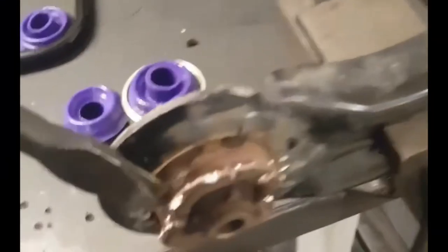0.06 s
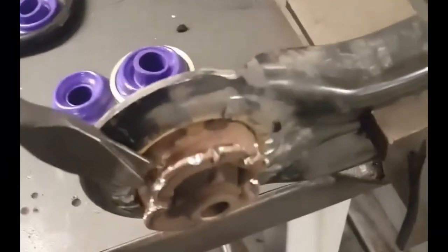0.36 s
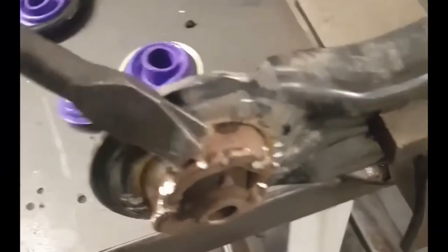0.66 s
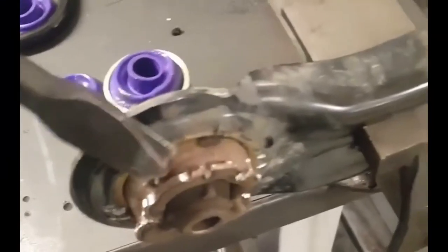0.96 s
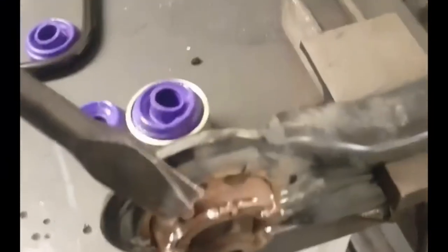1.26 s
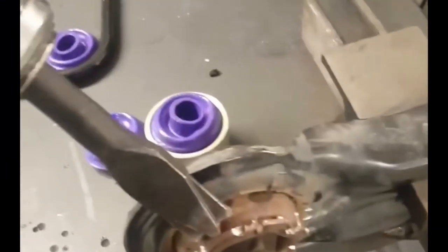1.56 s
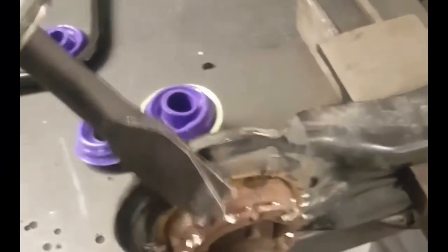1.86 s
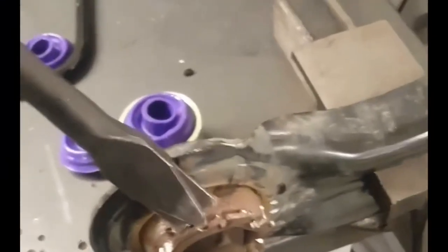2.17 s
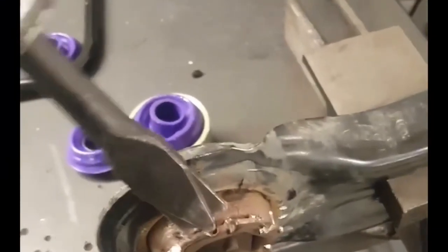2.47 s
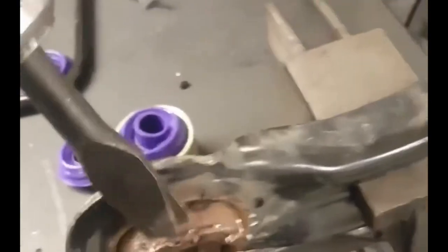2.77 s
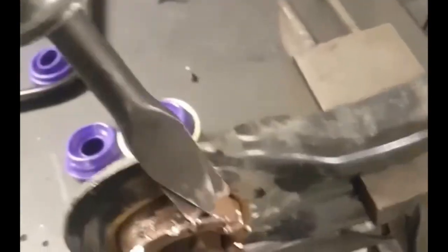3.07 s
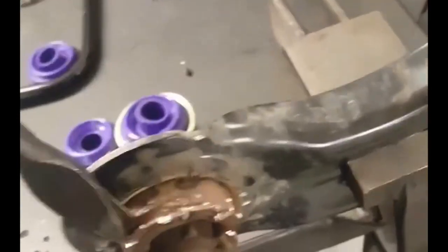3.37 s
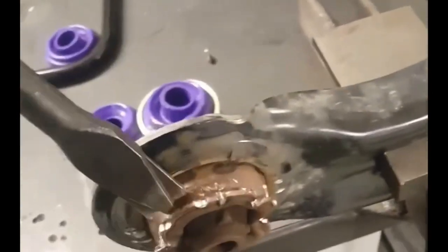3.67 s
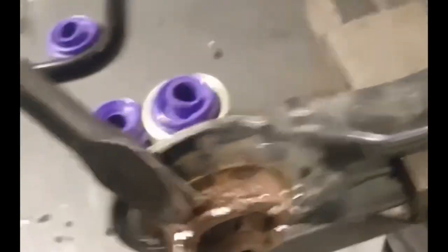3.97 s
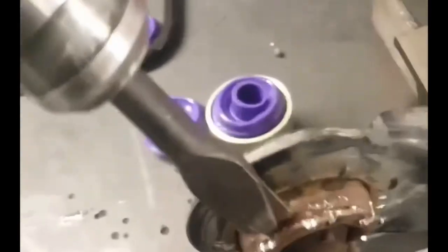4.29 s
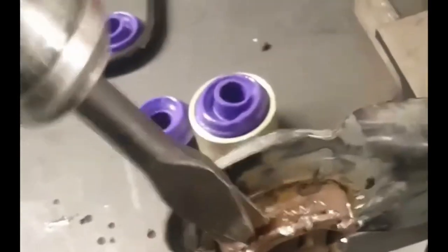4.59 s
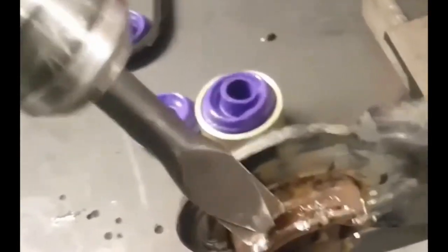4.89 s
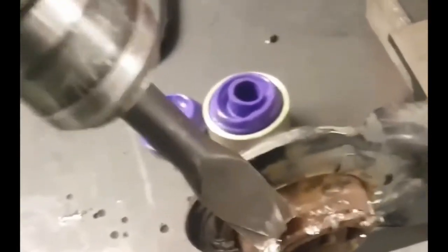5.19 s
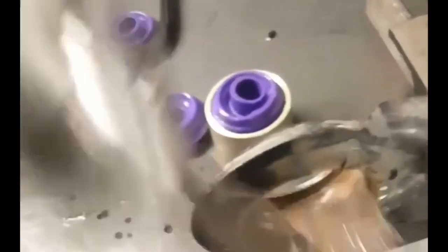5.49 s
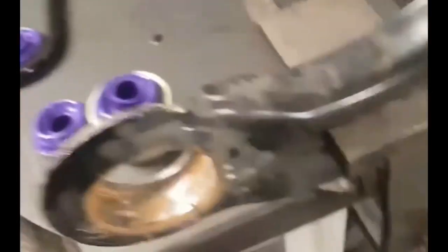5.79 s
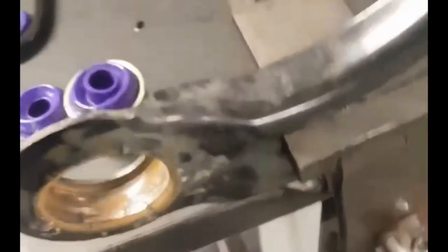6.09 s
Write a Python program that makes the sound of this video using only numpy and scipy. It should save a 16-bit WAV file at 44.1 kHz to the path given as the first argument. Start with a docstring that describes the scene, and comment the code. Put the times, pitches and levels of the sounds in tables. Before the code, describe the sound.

An air chisel works on a steel suspension arm near the microphone. Handling thuds and a light hiss lead into a stuttering string of metallic strikes that slows, picks up and ends in a quick burst. A lull follows, with a knock and more hissing, then the tool roars four times in short, bright, rattling runs. The chisel clinks loosely in the gaps, over a low wash of workshop noise.

```python
"""An air hammer drives a chisel into the bush of a steel suspension arm, close by in an echoing workshop.
At half throttle the piston slows and picks up again, each stroke a puff of exhaust and a blow on steel;
full throttle gives short roaring runs of about 41 blows a second, the bouncing edge rattling on top.
Dull thuds come from handling the chisel and as the hammer starts; the chisel knocks loosely, and air
hisses as the trigger is eased in. A wash of workshop noise swells and sinks behind it all."""
import sys
import numpy as np
from scipy import signal
from scipy.fft import rfft, irfft, next_fast_len
from scipy.io import wavfile
from scipy.ndimage import uniform_filter1d

SR = 44100
rng = np.random.default_rng(int(sys.argv[2]) if len(sys.argv) > 2 else 0)


def generate_wav(sig):
    """Save sig (samples, or channels by samples) to the path in sys.argv[1] as 16-bit PCM at SR."""
    pcm = np.round(np.clip(np.atleast_2d(sig).T, -1, 1) * 32767).astype(np.int16)
    wavfile.write(sys.argv[1], SR, pcm)


N = 275625
LEFT_LEAD_S = .00036  # the tool's sound reaches the left side first


def amp(db):
    """Decibels to gain."""
    return 10 ** (np.asarray(db) / 20)


def unit(x):
    """x at rms 1."""
    return x / np.sqrt(np.mean(x ** 2) + 1e-20)


def along(points, hz):
    """Read a curve of (Hz, value) points on a log frequency axis."""
    freqs, values = np.transpose(points)
    return np.interp(np.log(hz + 1), np.log(freqs + 1), values)


def filtered(x, response):
    """Filter x by a complex response, given as a function of Hz."""
    size = next_fast_len(N + SR // 2)
    return irfft(rfft(x, size) * response(np.fft.rfftfreq(size, 1 / SR)), size)[..., :N]


def add(track, start_s, sound):
    """Mix a sound into a track."""
    part = track[..., max(round(start_s * SR), 0):][..., :sound.shape[-1]]
    part += sound[..., :part.shape[-1]]


def bursts(times, levels_db, rise, hold, t60):
    """Envelope of bursts that rise, hold and die away (all in seconds); overlaps add in power."""
    t = np.arange(SR // 2) / SR
    power = np.zeros(N)
    for start, db, attack, held in np.broadcast(times, levels_db, rise, hold):
        burst = (1 - np.exp(-t / attack)) * amp(db - 60 * np.maximum(t - held, 0) / t60)
        add(power, start, burst ** 2)
    return np.sqrt(power)


# Stereo image of the direct sound. Each row: frequency in Hz, left-right likeness from 0 to 1.
DIRECT_LIKENESS = [(60, .6), (130, .7), (250, .92), (500, 0.95), (1300, 0.65), (2500, 0.35), (5000, 0.27),
                   (12000, 0.12)]
def noise(spectrum, patchy_db, lead_s=LEFT_LEAD_S, patch=(4, 5)):
    """Stereo noise of rms 1 whose colour shifts in patches of (bins, frames); the left side leads."""
    def mid_side(hz):
        angle = np.arccos(np.clip(along(DIRECT_LIKENESS, hz), -1, 1)) / 2
        return amp(along(spectrum, hz)) * [np.cos(angle), np.sin(angle)]

    white = signal.stft(rng.standard_normal((2, N)), nperseg=512)[2]
    patches = uniform_filter1d(rng.standard_normal(white.shape[1:]), size=patch[0], axis=0)
    patches = uniform_filter1d(patches, size=patch[1], axis=1)
    colour = amp(patchy_db * 2 * np.tanh(unit(patches) / 2))
    mottled = signal.istft(white * colour, nperseg=512)[1][:, :N]
    mid, side = filtered(mottled, mid_side)
    stereo = np.array([mid + side, mid - side])
    early_s = np.array([[lead_s], [-lead_s]]) / 2
    return unit(filtered(stereo, lambda hz: np.exp(2j * np.pi * hz * early_s)))


# Decay of the workshop's reverb. Each row: frequency in Hz, t60 in seconds.
ROOM_DECAY = [(100, 0.11), (400, 0.71), (1200, 0.37), (3000, 0.36), (6000, 0.25), (12000, 0.33)]
# Stereo image of the reflections. Each row: frequency in Hz, left-right likeness from 0 to 1.
ECHO_LIKENESS = [(100, .45), (300, 0.99), (700, 0.36), (1500, 0)]
def reflections(x, decay, build_s, span_s=.45):
    """Diffuse echoes, drawn afresh every span so no fixed pitch rings on; decay varies with frequency."""
    out = np.zeros((2, N))
    for start in np.arange(0, N / SR, span_s):
        hz, t, wash = signal.stft(rng.standard_normal((2, SR * 2 // 3)), SR, nperseg=256)
        alike = np.clip(along(ECHO_LIKENESS, hz), 0, 1)[:, None]
        wash[1] = alike * wash[0] + np.sqrt(1 - alike ** 2) * wash[1]
        tail = signal.istft(wash * amp(-60 * t / along(decay, hz)[:, None]), SR, nperseg=256)[1]
        tail *= 1 - np.exp(-np.arange(tail.shape[1]) / SR / build_s)
        part = x[:, round(start * SR):round((start + span_s) * SR)]
        add(out, start, signal.fftconvolve(part, tail / np.linalg.norm(tail[0]), axes=1))
    return out


# Fader ride of the background bed. Each row: time in seconds, relative level in dB.
BED_RIDE = [(0, -31.5), (.27, -43), (.55, -45), (.99, -36.5), (1.005, -30), (1.45, -40.5), (3.3, -34),
            (3.65, -47.5), (4.2, -32), (5.7, -29), (6.25, -29.5)]
# Tone of the bed. Each row: frequency in Hz, relative level in dB.
BED_TONE = [(30, -72), (80, -5.5), (130, -3.5), (250, -3.5), (500, -3), (800, 1.5), (1200, 6.5),
            (2000, 1.5), (3500, -4), (5000, -15), (8500, -18), (10500, -16), (13000, -25)]
def workshop():
    """A diffuse bed of noise, a little to the right, that swells and sinks."""
    level_db = np.interp(np.arange(N) / SR, *np.transpose(BED_RIDE))
    return amp(level_db) * noise(BED_TONE, patchy_db=1.5, lead_s=LEFT_LEAD_S / 2) * amp([[2.5], [5.5]])


# Air escaping at the valve. Each row: start in seconds, end in seconds, relative level in dB.
AIR_LEAKS = [(0.487, 1.665, -33), (3.054, 3.85, -46), (3.732, 4.226, -27)]
# Tone of the hiss. Each row: frequency in Hz, relative level in dB.
HISS_TONE = [(150, 5), (500, -2), (900, -36), (1500, 4.5), (2300, -6), (3500, 4), (5000, 5), (6500, 2.5),
             (8300, -1.5), (10000, 5), (12500, 6)]
def air(swell_s=.36, cut_s=.0039):
    """Air hisses from the half-open valve, swelling until the piston takes it; a faint leak stays on."""
    t = np.arange(N) / SR
    flow = sum(amp(db) * np.clip((t - start) / swell_s, 0, 1) * np.clip((end - t) / cut_s, 0, 1)
               for start, end, db in AIR_LEAKS)
    hiss = noise(HISS_TONE, patchy_db=1, lead_s=LEFT_LEAD_S / 2)
    return (flow + amp(-48)) * hiss * amp([[5.5], [5.8]])


# Dull low thuds. Each row: start in seconds, relative thud level in dB,
# scrape in dB against that level, hold in seconds, attack in seconds.
LOW_THUDS = [(0.575, -36.5, -2, .02, 0.0024), (0.639, -38.5, 16.5, 0.036, .008),
             (0.667, -19.5, -1.5, 0.026, .0013), (0.74, -35.5, 4.5, 0.035, 0.011),
             (0.946, -36, -18, .033, .004), (1.127, -32, -22, 0.036, .004),
             (1.251, -32.5, -19, .035, 0.0045), (1.706, -16.5, -14, 0.03, .0013),
             (3.886, -22.5, 2, 0.017, 0.0031), (4.219, -18, -16, 0.042, 0.0017)]
# Tone of the thud. Each row: frequency in Hz, relative level in dB.
THUD_TONE = [(25, -13), (70, -6.5), (110, 0.5), (160, 0), (250, 1), (390, -0.5), (550, -12.5), (1000, -31),
             (3000, -63)]
def low_thuds():
    """Dull thuds from handling the chisel and thumps of air as the hammer starts, each with a scrape."""
    times, db, scrape_db, hold, rise = np.transpose(LOW_THUDS)
    thud = bursts(times, db - .5, rise, hold, t60=.31) * noise(THUD_TONE, patchy_db=3, lead_s=0)
    scrape_level = bursts(times - .002, db + scrape_db, rise, hold, t60=.2)
    scrape = noise(CLANG_TONE, patchy_db=7.5) + amp(-9) * noise(SNAP_TONE, patchy_db=5)
    return thud + scrape_level * scrape


CAVITY_HZ = 638
def puffs(times, levels_db, hz, glide_hz_per_s=19400, cavity_share=1.0, peak_s=.0036):
    """Each puff of exhaust is a short, swelling upward chirp that also rings the exhaust cavity."""
    t = np.arange(SR // 10) / SR
    swell = (t / peak_s * np.exp(1 - t / peak_s)) ** 2
    out = np.zeros(N)
    for start, db in zip(times, levels_db):
        note_hz, cavity_hz = np.array([hz, CAVITY_HZ]) * (1 + .11 * rng.standard_normal(2))
        note = np.sin(2 * np.pi * (note_hz + glide_hz_per_s * t / 2) * t)
        cavity = cavity_share * np.cos(2 * np.pi * cavity_hz * t)
        add(out, start, amp(db) * swell * (note + cavity))
    return out


# Kicks of the valve as the piston starts from rest.
# Each row: start in seconds, relative gust level in dB, cavity ring level in dB.
VALVE_KICKS = [(1.6445, -10, -5), (1.671, -6, -5.5), (1.696, -2, -19), (4.219, -2.5, -30)]
def valve(cavity_lag_s=.0083, push_s=.0009):
    """The opening valve sends a low gust, and the exhaust cavity rings after it."""
    times, gust_db, ring_db = np.transpose(VALVE_KICKS)
    t = np.arange(SR // 10) / SR
    gust = (1 - t / push_s) * np.exp(-t / push_s) * (1 - np.exp(-t / .000068))
    out = puffs(times + cavity_lag_s, ring_db, CAVITY_HZ, glide_hz_per_s=0)
    for start, db in zip(times, gust_db):
        add(out, start, amp(db + 9) * gust)
    return out


def grit(depth_db=6):
    """Gain of rms 1 that breaks a rattle into tiny impacts, about a millisecond each."""
    flicker = unit(uniform_filter1d(rng.standard_normal(N), size=40))
    return unit(amp(depth_db * np.tanh(flicker)))


# Tone of the ringing bounces, before an upward tilt. Each row: frequency in Hz, relative level in dB.
CLATTER_TONE = [(700, -4), (1200, 1), (2100, 1), (3100, -1.5), (4000, -11), (5000, -5), (6500, -12),
                (8200, -14), (10000, -15.5), (13000, -9.5)]
def clatter(drive, bounces_per_s=2000, mean_t60=.065, spread_db=10, band_hz=(700, 13000)):
    """The edge bounces at random, as hard as it is driven; each bounce rings one of many steel modes."""
    t = np.arange(SR // 20) / SR
    when, pitch, size, life, *phases = rng.random((int(bounces_per_s * N / SR), 6)).T
    phases = np.array(phases)
    hz = np.interp(pitch, [0, 1], np.sqrt(band_hz)) ** 2
    force = drive[(when * N).astype(int)]
    gain = force * amp(along(CLATTER_TONE, hz) + spread_db * size) * hz ** .25
    out = np.zeros((2, N))
    for k in np.flatnonzero(force > drive.max() / 50):
        fade = gain[k] * amp(-60 * t / (mean_t60 * (.5 + life[k])))
        add(out, when[k] * N / SR, fade * np.sin(2 * np.pi * (hz[k] * t + phases[:, k, None])))
    return unit(out) * np.sqrt(np.mean(drive ** 2))


# Modes of the chisel and arm. Each row: pitch in Hz, relative level in dB, t60 in seconds.
STEEL_MODES = [(834, 3, .06), (1197, 7, .08), (1534, 0, .05), (1630, 3, .06), (1845, 3, .06),
               (2277, -1, .05), (2799, 2, .05), (3050, 1, .06), (3290, 2, .04), (4757, 0, .06),
               (5373, -1, .06), (7181, -2, .07), (9496, -1, .06), (12138, 0, .05)]
def steel(times, levels_db, scatter_db=4, detune=.003):
    """Each blow rings the modes at new strengths; the shifting contact detunes them a little."""
    t = np.arange(SR // 8) / SR
    hz, db, t60 = np.transpose(STEEL_MODES)[:, :, None]
    fade = amp(db - 60 * t / t60) * (1 - np.exp(-t / .00086))
    out = np.zeros((2, N))
    for start, level_db in zip(times, levels_db):
        modes = fade * np.exp(2j * np.pi * hz * (1 + detune * rng.standard_normal(hz.shape)) * t)
        strengths = amp(scatter_db * rng.standard_normal((2, len(hz))))
        phases = np.exp(2j * np.pi * rng.random((2, len(hz))))
        add(out, start, amp(level_db) * ((strengths * phases) @ modes).real)
    return out


def shank(times, levels_db, hz=4910, t60=.031):
    """A square blow rings the chisel along its length: a short bright ping."""
    t = np.arange(SR // 10) / SR
    out = np.zeros((2, N))
    for start, db in zip(times, levels_db):
        pitch_hz = hz * (1 + .012 * rng.standard_normal())
        stereo_phase = np.array([[0], [rng.normal(0, .15)]])
        envelope = amp(db + .5 - 60 * t / t60) * (1 - np.exp(-t / .00089))
        add(out, start, envelope * np.sin(2 * np.pi * (pitch_hz * t + stereo_phase)))
    return out


# Midrange body of a blow. Each row: frequency in Hz, relative level in dB.
CLANG_TONE = [(30, -39), (100, -9.5), (300, -2), (700, 1), (1250, 1), (2100, -4), (3100, -6), (4000, -12.5),
              (6000, -25), (13000, -30.5)]
# Bright snap of the edge. Each row: frequency in Hz, relative level in dB.
SNAP_TONE = [(1000, -4), (3500, 27.5), (5000, 17.5), (6500, 19), (8200, 15), (10000, 21.5), (13000, 17)]
def blows(times, db, snap_db, contact_s):
    """The shank ticks in its holder, then the edge cracks and skitters on the steel: (body, edge)."""
    strike = bursts(times, db + 2.5, rise=.00061, hold=contact_s, t60=.0046)
    chatter = bursts(times - .003, db - 9, rise=.0017, hold=.0076, t60=.051)
    clang = np.hypot(strike, chatter) * noise(CLANG_TONE, patchy_db=6.5)
    tick = bursts(times - .006, snap_db - 8, rise=.0007, hold=.0022, t60=.012)
    crack = bursts(times, snap_db + 2, rise=.00019, hold=contact_s, t60=.0088)
    skitter = bursts(times, snap_db + .5 * db - 5, rise=.003, hold=1.5 * contact_s, t60=.022)
    snap = np.sqrt(tick ** 2 + crack ** 2 + skitter ** 2) * grit() * noise(SNAP_TONE, patchy_db=6.5)
    rebound = clatter(bursts(times, db - 11, rise=.002, hold=3 * contact_s, t60=.04))
    return clang + steel(times, db - 24.5), snap + rebound


# Stray hits around the runs. Each row: start in seconds, relative clang and snap levels in dB.
LOOSE_KNOCKS = [(0.5743, -28, -22), (0.6642, -20.5, -20.5), (3.156, -25, -23), (3.8795, -15, -15),
                (4.214, -20, -17), (4.4821, -17, -26), (4.612, -15, -31), (4.896, -18, -31),
                (4.937, -19, -26), (5.1505, -8.5, -20), (5.3158, -19, -21.5), (5.624, -20, -25),
                (5.653, -38, -27.5), (5.687, -33, -29)]
def knocks():
    """The chisel jumps loosely against the housing: (body, edge)."""
    return blows(*np.transpose(LOOSE_KNOCKS), contact_s=.0057)


# Single piston strokes. Each row: start in seconds, relative clang and snap levels in dB,
# contact time in seconds, relative level of the shank's ping in dB.
PISTON_STROKES = [(1.673, -23, -19.5, 0.0056, -37), (1.695, -15, -16, 0.003, -30),
                  (1.7203, -13, -13.5, .006, -4.5), (1.748, -25, -23, 0.0052, -34),
                  (1.777, -27, -28, 0.013, -34), (1.806, -12.5, -18, 0.009, -30),
                  (1.839, -9, -15.5, .0064, -28), (1.876, -17.5, -19.5, 0.0064, -27),
                  (1.915, -13.5, -20.5, .011, -34), (1.952, -18.5, -22, .0138, -18),
                  (1.989, -11, -18.5, 0.0069, -35), (2.029, -13, -17.5, 0.009, -34),
                  (2.069, -11.5, -25, 0.0073, -32), (2.109, -11, -17, 0.0063, -30),
                  (2.154, -18.5, -20.5, 0.0075, -12), (2.206, -13, -18.5, 0.0042, -14),
                  (2.276, -18.5, -18, .0022, -27), (2.34, -20, -21.5, 0.0025, -38),
                  (2.403, -19.5, -30, 0.0032, -44), (2.46, -14, -20.5, .0024, -32),
                  (2.516, -9, -16, 0.0029, -38), (2.576, -11.5, -17, 0.0033, -44),
                  (2.631, -10, -21, 0.0027, -36), (2.681, -17.5, -28.5, 0.012, -42),
                  (2.738, -10.5, -17.5, 0.0027, -12.5), (2.788, -13, -19, 0.0052, -20),
                  (2.833, -10.5, -18.5, 0.0086, -28), (2.86, -21, -22, 0.0086, -34),
                  (3.016, -18, -20, 0.0084, -32), (3.066, -13.5, -20, 0.0053, -21)]
def half_throttle(forward_hz=305.5, return_hz=490):
    """A low puff leads each blow; a slow piston puffs higher on its way back: ((body, edge), exhaust)."""
    times, db, snap_db, contact_s, shank_db = np.transpose(PISTON_STROKES)
    scatter_db = rng.standard_normal((len(times), 2))
    slow = np.diff(times) > 1 / 21  # under 21 strokes a second
    midway = (times[:-1] + times[1:])[slow] / 2
    forward = puffs(times - .00773, scatter_db[:, 0] - 15.5, forward_hz)
    back = puffs(midway - .0039, scatter_db[1:, 1][slow] - 14.5, return_hz, cavity_share=.33)
    body, edge = blows(times, db, snap_db, contact_s)
    return (body, edge + shank(times, shank_db)), forward + back


# Full-throttle runs. Each row: start in seconds, length in seconds, mid-run drive in dB,
# relative level of the opening crash in dB.
TRIGGER_PULLS = [(1.716, 0.071, -24, -15), (2.863, 0.14, -23.5, -18), (4.2387, 0.17, -20.5, -4.5),
                 (4.63, 0.18, -21.5, -13.5), (4.953, 0.183, -21, -14.5), (5.327, 0.2, -21.5, -13.5)]
def throttle(t, coast_s=0, attack_s=.008, sag_db_per_s=10, release_db_per_s=850):
    """Drive at times t: each run opens fast, sags while held, and dies away coast_s after release."""
    gain = np.zeros(len(t))
    for start, length, db, _ in TRIGGER_PULLS:
        age = np.maximum(t - start, 0)
        sag_db = sag_db_per_s * (age - length / 2)
        release_db = release_db_per_s * np.maximum(age - length - coast_s, 0)
        gain += (1 - np.exp(-age / attack_s)) * amp(db - sag_db - release_db)
    return gain


# Tone of the exhaust's bark. Each row: frequency in Hz, relative level in dB.
EXHAUST_TONE = [(30, -28), (110, -11.5), (260, -25), (370, 1.5), (480, -3.5), (600, 0), (800, 0),
                (1000, -4), (1600, -6.5), (5000, -31)]
# Tone of the bouncing chisel. Each row: frequency in Hz, relative level in dB.
RATTLE_TONE = [(700, -34), (1500, 10), (3000, 11), (4200, 11), (5400, 2), (6500, -1), (8200, -11),
               (10000, 10), (13000, -3)]
def full_throttle(blows_per_s=41.5, coast_s=.035, jitter_s=.0008):
    """The piston runs free: a crash, then a blow, exhaust bark and rattle each cycle: (body, edge)."""
    starts, lengths, _, crash_db = np.transpose(TRIGGER_PULLS)
    times = np.concatenate([np.arange(start + 1 / blows_per_s, end + 2 * coast_s, 1 / blows_per_s)
                            for start, end in zip(starts, starts + lengths)])
    level_scatter, time_scatter = rng.standard_normal((len(times), 2)).T
    # The exhaust barks on after the blows fade, while the piston coasts.
    db, bark_db = 20 * np.log10([throttle(times), throttle(times, coast_s)]) + 1.5 * level_scatter
    times = times + jitter_s * time_scatter
    drive = throttle(np.arange(N) / SR)

    beat = np.hypot(bursts(times, db, rise=.0015, hold=.007, t60=.04), .45 * drive)
    crash = bursts(starts, crash_db, rise=.0008, hold=.009, t60=.04)
    clang = np.hypot(amp(3) * beat, amp(3.5) * crash) * noise(CLANG_TONE, patchy_db=5)
    venting = bursts(times - .004, bark_db + 4.5, rise=.00023, hold=.0025, t60=.19)
    bark = venting * noise(EXHAUST_TONE, patchy_db=6.5, patch=(2, 6))

    bounce = np.hypot(bursts(times, db, rise=.00057, hold=.0036, t60=.044), drive)
    rattle_force = .6 * np.hypot(amp(1.5) * bounce, crash)
    rattle = rattle_force * grit() * noise(RATTLE_TONE, patchy_db=8.5, patch=(4, 7))
    ringing = clatter(amp(4) * bounce)
    bite_force = np.hypot(amp(-2) * crash, amp(-9) * bounce)
    bite = bite_force * grit() * noise(SNAP_TONE, patchy_db=8, patch=(4, 6))
    return clang + bark + steel(times, db - 7), rattle + ringing + bite


def scene():
    """The tool, quick bench reflections and the workshop's reverb; edge, exhaust and thuds sit drier."""
    strokes, exhaust = half_throttle()
    body, edge = np.sum([strokes, full_throttle(), knocks()], axis=0)
    exhaust = exhaust + valve()
    port = np.array([exhaust, np.roll(exhaust, round(LEFT_LEAD_S * SR / 2))])
    thuds = low_thuds()
    bench_send = body + port + thuds + amp(-11) * edge
    bench = amp(-3) * reflections(bench_send, decay=[(200, .041), (10000, .14)], build_s=.0036)
    room_send = body + amp(-5.5) * port + amp(-12.5) * thuds + amp(-4.5) * edge
    room = amp(-6) * reflections(room_send, ROOM_DECAY, build_s=.051)
    return body + edge + port + thuds + bench + room + air() + workshop()


def record(dry, low_cut_hz=55, top_hz=13150, limit_db=-8.5, limiter_s=.006):
    """Thin the deep bass, brighten the left, limit and soft-clip the loudest blows, cut the very top."""
    tilt = lambda hz: amp(along([(5000, .069), (9000, 1)], hz) * np.array([[1], [-1]]))
    x = filtered(dry, lambda hz: tilt(hz) * 1j * hz / (low_cut_hz + 1j * hz))
    pole = np.exp(-1 / (limiter_s * SR))
    power = signal.lfilter([1 - pole], [1, -pole], np.mean(x ** 2, axis=0))
    limited = x / (1 + (power / amp(limit_db) ** 2) ** 4) ** (1 / 8)
    clipped = limited / (1 + (limited / .95) ** 4) ** (1 / 4)
    return filtered(clipped, lambda hz: hz < top_hz)


dry = scene()
out = record(dry)
generate_wav(out)
```